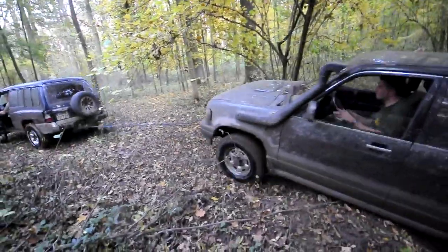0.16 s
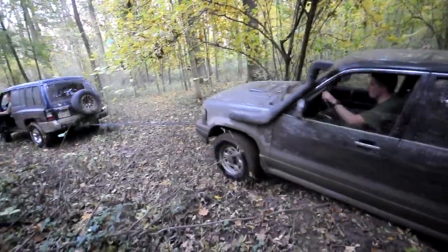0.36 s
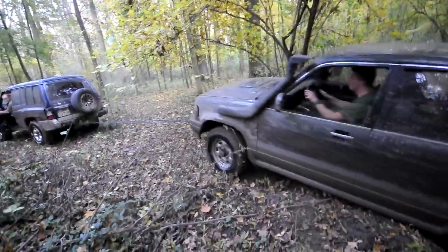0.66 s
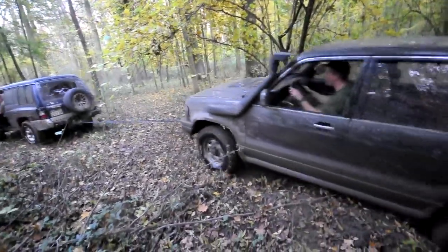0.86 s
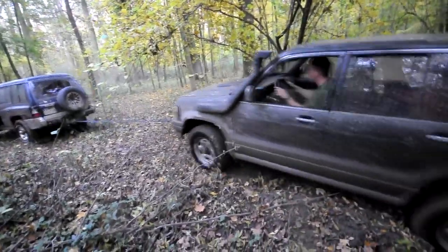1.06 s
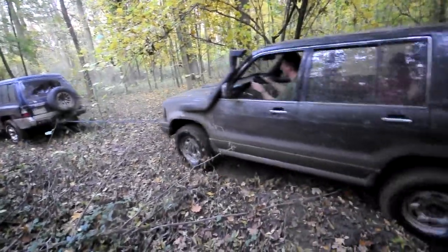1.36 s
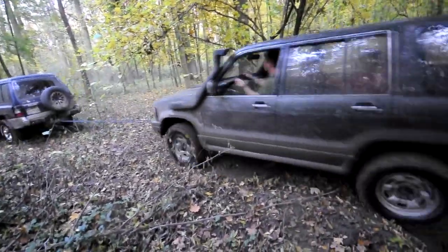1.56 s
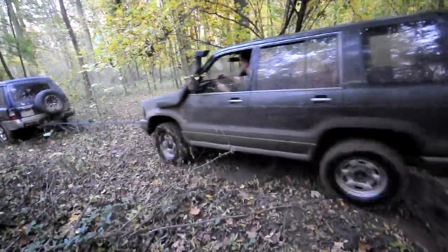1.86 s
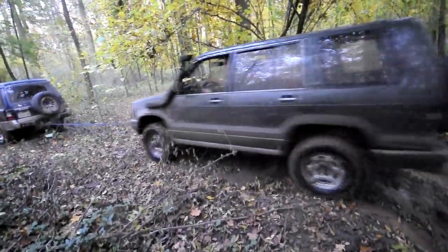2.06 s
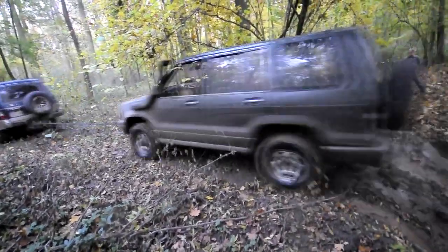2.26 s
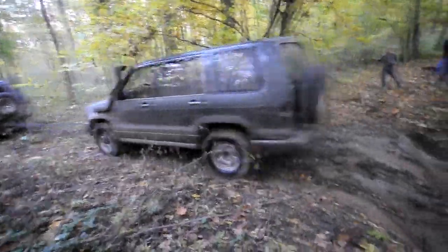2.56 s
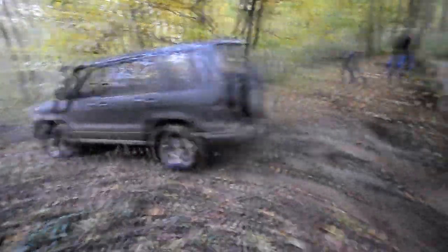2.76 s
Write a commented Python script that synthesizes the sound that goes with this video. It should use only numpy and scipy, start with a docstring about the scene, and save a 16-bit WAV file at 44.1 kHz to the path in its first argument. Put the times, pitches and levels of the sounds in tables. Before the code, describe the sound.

An off-road vehicle's engine pulls past very close, droning and chugging as it revs up to a peak at about 1.1 seconds. The revs then fall, settling to a quieter fast idle by 2.2 seconds. Tyres crackle through wet leaves and mud throughout, with scattered twig snaps from 0.4 to 2.2 seconds and a faint gear whine. The body gives a soft thump near 2.9 seconds.

```python
"""Wet forest ground: a four-cylinder off-roader pulls past at arm's length, revs up, drops to a fast idle.
Tyres churn mud and leaves, twigs snap, the gears whine faintly, and the body thumps at the end.
Intake and cooling fan roar and whistle; the block clatters once a firing.
The exhaust drones on harmonics of the firing rate and chugs as gas puffs ring the silencer."""
import sys
import numpy as np
from scipy import signal
from scipy.fft import rfft, irfft
from scipy.io import wavfile
from scipy.ndimage import uniform_filter1d

SR = 44100
rng = np.random.default_rng(int(sys.argv[2]) if len(sys.argv) > 2 else 0)


def store_pcm(level_fs):
    """Save levels as 16-bit WAV."""
    pcm = np.round(np.clip(level_fs, -1, 1) * 32767).astype(np.int16)
    wavfile.write(sys.argv[1], SR, np.atleast_2d(pcm).T)


N = 127890
T = np.arange(N) / SR
BIN_HZ = np.arange(N + 1) * SR / (2 * N)


def undb(db):
    """Decibels to gain."""
    return 10 ** (np.asarray(db) / 20)


def unit(x):
    """Scale to rms 1."""
    return x / np.sqrt(np.mean(x ** 2))


def curve(table, column=1):
    """One column of a time table, linearly interpolated."""
    rows = np.array(table)
    return np.interp(T, rows[:, 0], rows[:, column])


def response(hz, points):
    """Gain of a (freq_hz, gain_db) table at hz."""
    rows = np.array(points)
    return undb(np.interp(np.log(np.maximum(hz, 1)), np.log(rows[:, 0]), rows[:, 1]))


def colour(x, points):
    """Filter by a (freq_hz, gain_db) table; white noise keeps its power."""
    return irfft(rfft(x, 2 * N) * unit(response(BIN_HZ, points)))[:N]


def walk(rate_hz):
    """Smooth random wander, rms 1."""
    hold = int(SR / rate_hz)
    steps = np.repeat(rng.standard_normal(N // hold + 1), hold)
    return unit(uniform_filter1d(uniform_filter1d(steps, hold), hold)[:N])


def grains(per_s):
    """Random impulses of either sign."""
    return (rng.random(N) < per_s / SR) * rng.choice([-1, 1], N)


# Rolling rumble: time_s, level_db
RUMBLE_LEVEL = [(0, -39), (.4, -47.5), (1.2, -39), (1.55, -45), (1.82, -39.5), (2.1, -33.5), (2.35, -49),
                (2.9, -47)]
# Rumble spectrum: freq_hz, gain_db
RUMBLE_SPECTRUM = [(20, -33), (40, -18), (55, 0), (72, 14.5), (92, 8.5), (125, 10), (180, 17), (300, -48.5)]


def rumble():
    """Rolling tyres and body make low noise."""
    return colour(rng.standard_normal(N), RUMBLE_SPECTRUM) * undb(curve(RUMBLE_LEVEL))


# Mud and leaf crackle: time_s, level_db
MUD_LEVEL = [(0, -36), (.55, -40), (1.1, -43), (1.65, -34), (2.1, -48), (2.3, -47), (2.43, -49),
             (2.47, -41), (2.53, -41.5), (2.9, -43)]
# Crackle spectrum: freq_hz, gain_db
MUD_SPECTRUM = [(400, -9), (1500, -4.5), (3800, -4), (4700, -8.5), (5500, -12), (7000, -24.5), (8500, -36),
                (10000, -69.5)]


def mud(trim_db=-0.5, scatter_db=2):
    """Wet leaves and mud crackle densely under the tread."""
    clicks = grains(per_s=600) * undb(scatter_db * np.minimum(rng.exponential(size=N), 4))
    return colour(unit(clicks), MUD_SPECTRUM) * undb(trim_db + curve(MUD_LEVEL) + 1.1 * walk(30.07))


# Tread on stones and wood: peak_s, half_width_s, centre_hz, level_db
TREAD_CRUNCHES = [(0.556, .04, 1690, -25), (.735, 0.028, 800, -22.5), (1.342, 0.0083, 990, -19),
                  (1.587, 0.022, 1490, -31)]


def crunches(half_width_oct=0.36):
    """The tread grinds and grips in short bursts of band-passed grains."""
    out = 0
    for peak_s, half_width_s, centre_hz, level_db in TREAD_CRUNCHES:
        band = np.exp(-(np.log2(np.maximum(BIN_HZ, 1) / centre_hz) / half_width_oct) ** 2)
        rasp = irfft(rfft(grains(per_s=700), 2 * N) * band)[:N]
        out += unit(rasp) * undb(level_db) * np.exp(-((T - peak_s) / half_width_s) ** 2)
    return out


# Branch scrape spectrum: freq_hz, gain_db
SCRAPE_SPECTRUM = [(1000, -8), (4300, 3), (5500, -5), (6800, -7.5), (8500, -29), (10000, -55)]


def scrape(peak_s=2.471, half_width_s=0.013, level_db=-41):
    """A branch scrapes: one brief hiss."""
    envelope = undb(level_db) * np.exp(-((T - peak_s) / half_width_s) ** 2)
    return colour(rng.standard_normal(N), SCRAPE_SPECTRUM) * envelope


# Twigs and stones: start_s, level_db, decay_s, treble_lift_db
TWIG_SNAPS = [(0.3847, -17, 0.0024, -2), (0.6977, -14.5, .002, 0), (.8084, -13, 0.0017, 1),
              (0.9625, -11, 0.0031, 1), (1.371, -13.5, .003, -2), (1.6087, -14.5, .0025, 2.5),
              (1.6256, -15, 0.0015, 1), (1.6475, -13, 0.0022, -8), (1.7908, -9, 0.0023, -5),
              (2.0954, -14, 0.0017, 0.5), (2.1696, -20, 0.0017, 2), (2.244, -22, .002, 6)]
# Snap spectrum: freq_hz, gain_db
SNAP_SPECTRUM = [(300, -22), (1500, 2), (3800, 5), (4700, -12), (5500, -19.5), (7200, -25), (8500, -37),
                 (10000, -62.5)]


def twigs(trim_db=-6, treble_hz=5100):
    """Twigs and stones snap under the tyres, each with its own brightness."""
    out = 0
    for start_s, level_db, decay_s, lift_db in TWIG_SNAPS:
        crack = rng.choice([-1, 1], N) * (T >= start_s) * np.exp(-np.abs(T - start_s) / decay_s)
        spectrum = [(hz, db + lift_db * (hz > treble_hz)) for hz, db in SNAP_SPECTRUM]
        out += undb(level_db + trim_db) * colour(crack, spectrum)
    return out


# Body panel modes: pitch_hz, gain_db
PANEL_MODES = [(165, -37), (240, 1.5), (285, 5.5)]


def thump(start_s=2.886, rise_s=0.0034, decay_s=0.025, gain_db=-21):
    """A jolt rings the body panels as the car moves off."""
    age_s = np.maximum(T - start_s, 0)
    ring = sum(undb(db) * np.sin(2 * np.pi * hz * age_s) for hz, db in PANEL_MODES)
    return undb(gain_db) * ring * (1 - np.exp(-age_s / rise_s)) * np.exp(-age_s / decay_s)


# Lower gear whine: time_s, pitch_hz, level_db
LOW_MESH = [(.05, 720, -26.5), (.28, 730, -26), (.48, 785, -25.5), (.6, 735, -27), (.74, 765, -25),
            (.95, 735, -50), (1.3, 745, -29.5), (1.6, 745, -34.5), (1.85, 745, -25.5), (1.97, 725, -30),
            (2.08, 690, -43)]
# Upper gear whine: time_s, pitch_hz, level_db
HIGH_MESH = [(1.7, 1466, -43), (1.87, 1360, -30), (2.0, 1190, -33), (2.08, 1133, -27.5), (2.15, 1048, -33),
             (2.19, 1000, -53)]


def gear_whine(mesh, waver, roughness, trim_db=-1.5):
    """Meshing teeth give a rough, wavering tone."""
    pitch_hz = curve(mesh) * (1 + waver * walk(69.8))
    gate = uniform_filter1d(1. * ((T > mesh[0][0]) & (T < mesh[-1][0])), SR // 20)
    flutter = 1 + roughness * (walk(110) + 1j * walk(110))
    teeth = flutter * np.exp(2j * np.pi * np.cumsum(pitch_hz) / SR)
    return gate * undb(curve(mesh, 2) + trim_db) * unit(teeth.real)


# Intake resonance: time_s, pitch_hz, level_db
INTAKE_WHISTLE = [(0, 1526, -44), (.7, 1523, -33), (.85, 1521, -28), (1.05, 1542, -29.5), (1.3, 1519, -33),
                  (1.55, 1537, -33.5), (1.68, 1652, -39), (1.85, 1668, -33), (1.98, 1674, -34),
                  (2.15, 1520, -46), (2.35, 1403, -35), (2.6, 1478, -42), (2.9, 1476, -48)]


def whistle(firing_hz, revved_width_hz=110, idle_width_hz=35):
    """Air rings a narrow intake resonance, breathy at high revs, purer at idle."""
    carrier = np.exp(2j * np.pi * np.cumsum(curve(INTAKE_WHISTLE)) / SR)
    breathy, pure = (unit(((walk(2 * width_hz) + 1j * walk(2 * width_hz)) * carrier).real)
                     for width_hz in (revved_width_hz, idle_width_hz))
    revs = (firing_hz - firing_hz.min()) / np.ptp(firing_hz)
    return (revs * breathy + np.sqrt(1 - revs ** 2) * pure) * undb(curve(INTAKE_WHISTLE, 2))


# Fan and alternator tones: firing_multiple, gain_db
BELT_ORDERS = [(4.15, -4), (4.5, -3.5), (8.75, -13)]


def belt(firing_hz, firings, gain_db=-19, waver_db=2, speed_exponent=4.6):
    """Belt-driven fan and alternator sing between the engine harmonics, louder with speed."""
    tones = 0
    for order, db in BELT_ORDERS:
        gain = undb(db + waver_db * walk(24.9))
        tones += gain * np.sin(2 * np.pi * (order * firings + 0.087 * walk(35) + rng.random()))
    return tones * undb(gain_db) * (firing_hz / firing_hz.max()) ** speed_exponent


# Passing engine bay: time_s, intake_db, fan_db, clatter_db
BAY_LEVELS = [(0, -23, -22.5, -23.5), (.3, -19.5, -23, -23), (.55, -17.5, -19.5, -20),
              (.64, -18, -21.5, -22), (.74, -18, -20.5, -21), (.9, -18, -20, -21.5),
              (1.1, -19.5, -22.5, -19), (1.19, -21, -23, -22.5), (1.36, -18, -22, -21),
              (1.48, -18.5, -21, -23), (1.6, -18, -19.5, -23), (1.7, -20.5, -23.5, -25.5),
              (1.82, -25, -22.5, -23.8), (1.98, -24.5, -24.5, -25), (2.08, -28, -25.5, -27.5),
              (2.35, -27, -29, -29.5), (2.55, -27.5, -30.5, -30), (2.9, -31, -29.5, -31)]
# Intake roar: freq_hz, gain_db
INTAKE_SPECTRUM = [(30, -76), (70, -28), (110, -14), (150, -5), (225, -1), (275, -0.5), (370, -2.5),
                   (440, -7), (560, -11.5), (900, -72), (3000, -82)]
# Fan roar: freq_hz, gain_db
FAN_SPECTRUM = [(60, -50), (250, -20), (430, -5), (560, 0.5), (660, 4.5), (745, 4.5), (820, 3), (885, 4),
                (1050, -1), (1300, -7), (2000, -22), (6000, -73)]
# Block clatter: freq_hz, gain_db
CLATTER_SPECTRUM = [(100, -61), (700, -15.5), (1150, -3), (1330, -1), (1560, -1), (1950, -2), (2400, -8),
                    (3000, -9), (4600, -17), (5500, -31.5), (6500, -31), (8000, -44), (9200, -53),
                    (10300, -75)]


def engine_bay(firing_hz, firings, knock_half_width_s=0.0026, scatter_db=0.2):
    """Each firing, the intake gulps and the block knocks, clearest at idle; the fan roars through both."""
    strength = undb(scatter_db * rng.standard_normal(N // 100))[firings.astype(int)]
    offset_s = (firings % 1 - .5) / firing_hz
    pulse = strength * np.exp(-(offset_s / knock_half_width_s) ** 2)
    knock_depth = np.interp(firing_hz, [firing_hz.min(), firing_hz.max()], [0.3, 0.11])

    def pulsed(spectrum, depth):
        return colour(unit(rng.standard_normal(N) * (1 + depth * pulse)), spectrum)

    intake = pulsed(INTAKE_SPECTRUM, depth=0.35) * undb(curve(BAY_LEVELS, 1) - 1)
    fan = pulsed(FAN_SPECTRUM, .5 * knock_depth) * undb(curve(BAY_LEVELS, 2) - 0.5 + 0.69 * walk(16))
    clatter = pulsed(CLATTER_SPECTRUM, knock_depth)
    clatter *= undb(curve(BAY_LEVELS, 3) - 1.1 + 0.53 * walk(24.57))
    return intake + fan + clatter


# Exhaust by firing order: time_s, second_db, third_db, others_db
EXHAUST_LEVELS = [(0, -30, -20, -28.5), (.15, -33, -32, -24.5), (.3, -25, -32, -25.5), (.42, -21, -26, -30),
                  (.61, -24.5, -24.5, -31.5), (.665, -34, -40, -30), (.735, -26, -18.5, -31),
                  (.83, -33.5, -40, -26), (1.04, -29.5, -36, -25.5), (1.14, -22.5, -19.5, -25),
                  (1.28, -27.5, -36, -30.5), (1.41, -44, -26, -33), (1.5, -20, -37, -34),
                  (1.58, -36, -22, -26), (1.85, -36.5, -32.5, -28), (2.05, -51, -44, -40.5),
                  (2.5, -43, -45, -42.5), (2.68, -45, -35, -40), (2.9, -42, -39, -32.5)]
# Other exhaust orders: firing_multiple, gain_db
EXHAUST_ORDERS = [(1, -6.5), (1.5, -15.5), (2.5, -14.5), (3.5, -10.5), (4, -2.5), (5, -6.5), (6, -6),
                  (7, -7), (8, -9)]
# Silencer response: freq_hz, gain_db
SILENCER_RESPONSE = [(30, -18), (50, -9.5), (70, -8), (85, -2.5), (112, 2), (150, -2.5), (180, 0),
                     (226, 2.5), (275, 0), (345, 1), (420, -7.5), (800, -1)]


def exhaust_drone(firing_hz, firings, waver_db=2):
    """Orders 2 and 3 boom cleanly; the others swell as they cross silencer resonances."""
    def tone(order):
        return np.sqrt(2) * np.sin(2 * np.pi * (order * firings + rng.random()))

    others = 0
    for order, db in EXHAUST_ORDERS:
        gain = undb(db + waver_db * walk(18)) * response(order * firing_hz, SILENCER_RESPONSE)
        others += gain * tone(order)
    booms = tone(2) * undb(curve(EXHAUST_LEVELS, 1)) + tone(3) * undb(curve(EXHAUST_LEVELS, 2))
    return booms + others * undb(curve(EXHAUST_LEVELS, 3))


# Silencer rung by a puff: freq_hz, gain_db
PUFF_SPECTRUM = [(60, -55.5), (130, -17), (190, -6.5), (226, 12.5), (265, -3.5), (350, 10.5), (400, -1.5),
                 (470, -11.5), (900, -37), (3000, -89.5), (10000, -130)]


def exhaust_puffs(firings, trim_db=-2, scatter_db=6, jitter_s=.001):
    """Each firing sends an uneven puff of gas down the pipe, so the exhaust chugs."""
    fired = np.flatnonzero(np.diff(np.floor(firings + .5)))
    lateness, strength = rng.standard_normal((len(fired), 2)).T
    onsets = np.clip(fired + jitter_s * SR * lateness, 0, N - 1).astype(int)
    pulses = np.bincount(onsets, undb(scatter_db * np.clip(strength, -2, 2)), N)
    return unit(colour(pulses, PUFF_SPECTRUM)) * undb(trim_db + curve(EXHAUST_LEVELS, 3))


# Engine speed: time_s, firing_hz
ENGINE_SPEED = [(0, 54), (.15, 49.8), (.3, 58.7), (.45, 63), (.61, 72.7), (.75, 76.5), (.9, 83), (1.1, 87),
                (1.3, 82.7), (1.5, 76), (1.65, 66.3), (1.8, 58), (2.0, 49), (2.22, 39.6), (2.52, 41),
                (2.7, 36.6), (2.9, 36.3)]


def scene():
    """One firing rate drives the engine layers; gears, ground and body join in. Mono."""
    firing_hz = uniform_filter1d(curve(ENGINE_SPEED), SR // 12) * (1 + 0.00309 * walk(15))
    firings = np.cumsum(firing_hz) / SR
    exhaust = exhaust_drone(firing_hz, firings) + exhaust_puffs(firings)
    engine = belt(firing_hz, firings) + engine_bay(firing_hz, firings) + whistle(firing_hz)
    gears = gear_whine(LOW_MESH, waver=.013, roughness=0.38)
    gears += gear_whine(HIGH_MESH, waver=0.005965, roughness=0.31)
    ground = rumble() + mud() + crunches() + scrape() + twigs()
    return (exhaust + engine + gears + ground + thump())[None]


def record(dry):
    """A steep low-pass cuts the top treble."""
    cutoff_hz = 10300
    return signal.sosfilt(signal.ellip(8, .2, 70, cutoff_hz, fs=SR, output="sos"), dry)


dry = scene()
out = record(dry)
store_pcm(out)
```